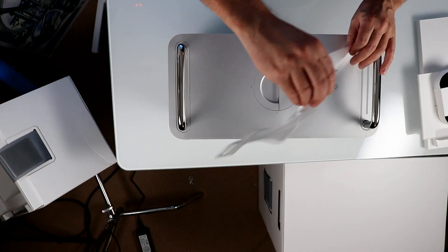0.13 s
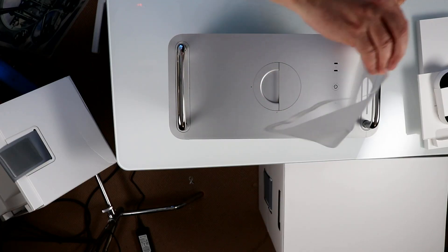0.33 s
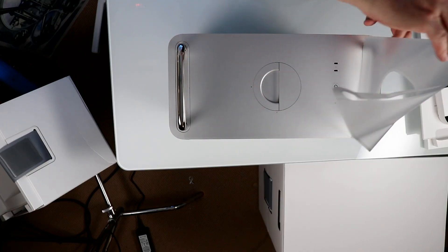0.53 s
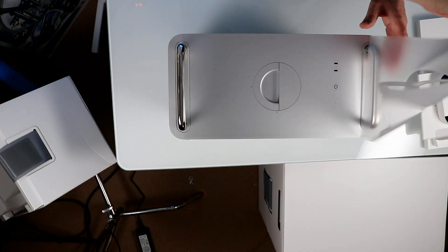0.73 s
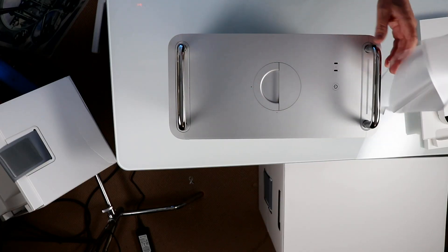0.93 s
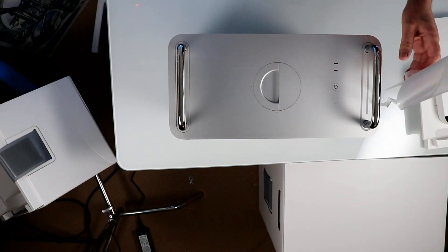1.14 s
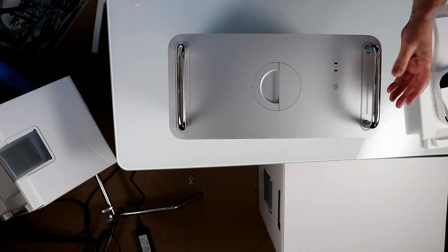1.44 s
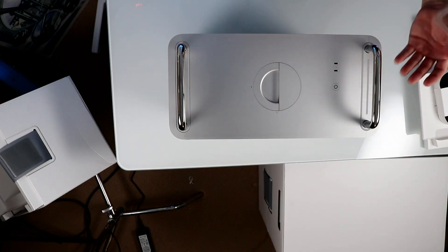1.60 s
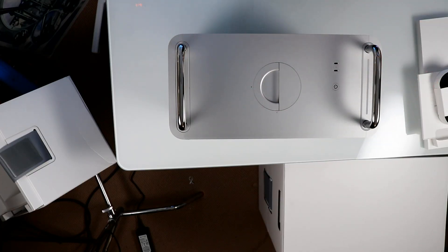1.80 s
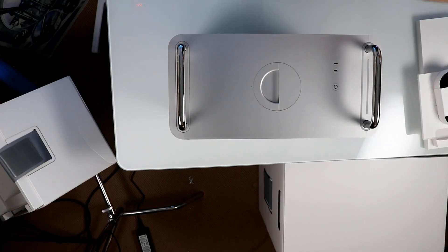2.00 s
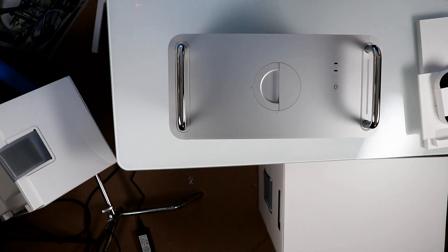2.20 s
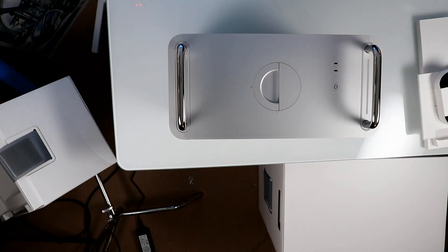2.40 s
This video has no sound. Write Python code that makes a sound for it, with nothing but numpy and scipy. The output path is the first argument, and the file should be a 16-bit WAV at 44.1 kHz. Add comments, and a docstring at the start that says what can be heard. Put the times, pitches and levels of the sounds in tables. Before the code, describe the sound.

Stiff protective film crinkles close to the microphone indoors, tearing free with a hard snap, pausing, crackling busily while moved away, then a few lighter snaps and faint ticks over very quiet hum and hiss.

```python
"""A soft rustle over faint mains hum and hiss is heard first, then a brief squeak and sharp snaps.
Thin stiff plastic film is pulled off a metal case, flapped and put aside, close to a microphone indoors.
Rustle is filtered random impulses; the glue squeak and the taut sheet's ring are noise through moving
resonances; creases snap as decaying noise bursts; air puffs are damped sines.
The room adds a diffuse tail to snaps, squeak and ring; a noise gate lowers everything in the pauses."""
import sys
import numpy as np
from scipy import signal
from scipy.fft import rfft, irfft
from scipy.io import wavfile
from scipy.ndimage import uniform_filter1d

SR = 44100
rng = np.random.default_rng(int(sys.argv[2]) if len(sys.argv) > 2 else 0)


def level_to_linear(level):
    """Convert decibel levels to linear amplitude factors, elementwise."""
    exponent = np.asarray(level, float) / 20
    return 10 ** exponent


def generate_wav(sig):
    """Save sig (samples, or channels by samples) to the path in sys.argv[1] as 16-bit PCM at SR."""
    pcm = np.round(np.clip(np.atleast_2d(sig).T, -1, 1) * 32767).astype(np.int16)
    wavfile.write(sys.argv[1], SR, pcm)


N = 112454  # length [samples]


def evened(x):
    """Normalisation: scales a signal to rms 1."""
    return x / np.sqrt(np.mean(x ** 2) + 1e-20)


def read(points, hz):
    """Spectral interpolation: reads a spectrum table on a logarithmic frequency axis."""
    f, value = np.transpose(points)
    return np.interp(np.log(hz + 1), np.log(f + 1), value)


def curve(table, index):
    """Envelope interpolation: one column of a time table at every sample."""
    table = np.array(table)
    return np.interp(np.arange(N) / SR, table[:, 0], table[:, index])


def add(mix, s, sound):
    """Superposition: adds a sound into the mix at time s."""
    part = mix[round(s * SR):][:len(sound)]
    part += sound[:len(part)]


def causal(gain_db):
    """Minimum-phase principle: the gain on the rfft bins fixes the phase, hence the impulse response."""
    log_gain = np.maximum(gain_db, -100) * np.log(10) / 20
    full = np.concatenate([log_gain, log_gain[-2:0:-1]])
    return np.fft.ifft(np.exp(np.conj(signal.hilbert(full)))).real


def slow(size):
    """Low-pass noise: a smooth random wobble of rms 1 from two moving averages."""
    once = uniform_filter1d(rng.standard_normal(N), size)
    return evened(uniform_filter1d(once, size))


def whistle(table, width_hz):
    """Heterodyne resonance: noise passes two equal poles, width_hz wide each, that follow a pitch curve."""
    turn = np.exp(2j * np.pi * np.cumsum(curve(table, index=1)) / SR)
    r = np.exp(-np.pi * width_hz / SR)
    x = rng.standard_normal(N) / turn
    for _ in range(2):
        x = signal.lfilter([1], [1, -r], x)
    t = np.arange(N) / SR
    inside = (t > table[0][0]) & (t < table[-1][0])
    return inside * level_to_linear(curve(table, index=2)) * evened((turn * x).real)


# rustle of the moving sheet: (time [s], body level [dB], treble level [dB], bass level [dB])
RUSTLE_LEVELS = [(0, -41.5, -39.5, -42), (.08, -47, -54.5, -51), (.12, -40, -52.5, -51),
                 (.16, -37, -44, -45.5), (.238, -40.5, -44.5, -47), (.242, -16.5, -23.5, -17.5),
                 (.275, -26.5, -29, -45), (.305, -22, -27, -31), (.36, -30, -36.5, -44.5),
                 (.43, -38, -43, -44.5), (.48, -39.5, -44.5, -48.5), (.56, -52, -54, -56),
                 (.74, -58.5, -61, -63), (.819, -50.5, -60.5, -55), (.823, -32, -35.5, -42),
                 (.86, -27.5, -33, -36.5), (.89, -25, -30.5, -33), (.94, -24.5, -32, -33),
                 (.96, -24, -31.5, -34), (1.0, -32.5, -36, -42.5), (1.04, -28, -30.5, -38.5),
                 (1.09, -35, -41, -40), (1.12, -32, -36, -42.5), (1.17, -47, -52.5, -54),
                 (1.22, -54, -58.5, -58), (1.355, -52.5, -56, -63), (1.358, -38.5, -46, -45),
                 (1.39, -33, -35.5, -46.5), (1.45, -45.5, -49, -51), (1.52, -51, -64.5, -52),
                 (1.62, -55.5, -61, -55.5), (1.87, -56.5, -61, -52), (1.91, -60.5, -60.5, -47.5),
                 (1.99, -53.5, -58, -46), (2.07, -56.5, -55.5, -58.5), (2.14, -49, -50.5, -54),
                 (2.146, -46, -41.5, -51), (2.19, -38, -43.5, -42.5), (2.24, -51.5, -53.5, -56.5),
                 (2.38, -59, -61, -61.5), (2.48, -56, -59, -53), (2.55, -55, -59, -49.5)]
# spectral shapes of the three ranges: (frequency [Hz], relative gain [dB])
BODY_SHAPE = [(200, -25), (500, -8), (800, -5), (1400, -0.5), (2500, -3.5), (4000, -5), (5200, -6.5),
              (7000, -14.5), (12000, -40.5)]
TREBLE_SHAPE = [(2500, -24.5), (5000, -13), (6500, -1.5), (10000, -5), (14000, -9.5), (16000, -13.5)]
BASS_SHAPE = [(12, -32), (30, -11), (120, -3), (300, -5), (700, -5.5), (1500, -13.5), (4000, -43.5)]
GRAINS_PER_S, GRAIN_SPREAD_DB, CLUMP_DB = 18000, 1.6, 1.1
PATCH_DB = 2  # rms variation of colour over time and frequency


def rustle():
    """Shot noise: clumped random crackles, patchy in colour, are filtered into three ranges."""
    spread_db = GRAIN_SPREAD_DB * np.minimum(rng.exponential(1, N), 5)
    size = level_to_linear(spread_db + CLUMP_DB * slow(size=150))
    grains = size * rng.standard_normal(N) * (rng.random(N) < GRAINS_PER_S / SR)
    z = signal.stft(grains, nperseg=256, noverlap=192)[2]
    patches = uniform_filter1d(rng.standard_normal(z.shape), size=6, axis=0)  # across frequency
    patches = evened(uniform_filter1d(patches, size=12, axis=1))  # along time
    grains = signal.istft(z * level_to_linear(PATCH_DB * patches), nperseg=256, noverlap=192)[1][:N]
    hz = np.fft.rfftfreq(4096, 1 / SR)
    out = np.zeros(N)
    for column, shape in enumerate((BODY_SHAPE, TREBLE_SHAPE, BASS_SHAPE), start=1):
        band = evened(signal.oaconvolve(grains, causal(read(shape, hz)))[:N])
        out += level_to_linear(curve(RUSTLE_LEVELS, index=column)) * band
    return out


# mains partials: (frequency [Hz], rms level before wavering [dB])
HUM_PARTIALS = [(59.6, -58.5), (119.6, -59.5), (240, -62), (360, -70.5)]
# spectral shape of the hiss: (frequency [Hz], relative gain [dB])
HISS_SHAPE = [(12, -23.5), (30, -4.5), (100, -1.5), (250, -10.5), (600, -11.5), (1500, -19.5),
              (5000, -33.5), (10000, -28), (16500, -38)]
HUM_WAVER_DB, HISS_DB = 1.5, -55.5  # rms of the waver, rms level of the hiss


def background():
    """Stationary sources: near-harmonic mains partials that waver in level, and shaped Gaussian hiss."""
    t = np.arange(N) / SR
    hum = np.zeros(N)
    for hz, db in HUM_PARTIALS:
        level = np.sqrt(2) * level_to_linear(db + HUM_WAVER_DB * slow(size=3000))
        hum += level * np.sin(2 * np.pi * (hz * t + rng.random()))
    spectrum = rfft(rng.standard_normal(N))
    hiss = irfft(spectrum * level_to_linear(read(HISS_SHAPE, np.fft.rfftfreq(N, 1 / SR))), N)
    return hum + level_to_linear(HISS_DB) * evened(hiss)


# taut sheet, a broad high band: (time [s], centre frequency [Hz], level [dB])
RING_PATH = [(.11, 4500, -60), (.135, 4700, -44), (.175, 5400, -43), (.2, 5000, -50), (.25, 4750, -45),
             (.29, 4750, -29), (.335, 4700, -29), (.37, 4600, -50)]


def sheet_ring():
    """Damped resonance: the taut sheet rings as a broad band of noise at a shifting pitch."""
    return whistle(RING_PATH, width_hz=900)


# decay time of the room by frequency: (frequency [Hz], 60 dB decay time [s])
ROOM_DECAY = [(200, .25), (1000, 0.33), (4000, .17), (12000, 0.17)]
ROOM_DB = -12.5  # tail gain


def room(x):
    """Diffuse reverberation: sparse random reflections, each band dying at its own speed."""
    taps = np.zeros(SR // 2)
    at = np.arange(100, SR // 2 - 20, 20)
    taps[at + rng.integers(0, 20, len(at))] = rng.choice([-1., 1.], len(at))
    hz, t, z = signal.stft(taps, SR, nperseg=256)
    decay = level_to_linear(-60 * t / read(ROOM_DECAY, hz)[:, None])
    tail = signal.istft(z * decay, SR, nperseg=256)[1]
    return signal.fftconvolve(x, tail / np.linalg.norm(tail))[:N]


# glue letting go: (time [s], centre frequency [Hz], level [dB])
SQUEAK_PATH = [(.128, 1850, -70), (.134, 1820, -39), (.165, 1750, -40), (.175, 1650, -45),
               (.185, 1600, -41), (.197, 1500, -47), (.21, 1450, -43), (.235, 1350, -47), (.245, 1350, -70)]


def glue_squeak():
    """Moving resonance: the glue squeaks, falling in pitch and uneven in level, as it lets go."""
    return whistle(SQUEAK_PATH, width_hz=340)


# creases snapping: (time [s], nominal peak level [dB], centre [Hz], breadth [octaves], decay time [ms])
CREASES = [(0.135, -38.5, 1720, 2.2, 3), (.2305, -13, 5150, 0.73, 0.39), (0.2401, -1, 2830, 2.53, 1.94),
           (0.2411, -8.5, 10600, 0.18, 1.2), (.246, -11.5, 4940, 2.7, 1.8), (.307, -17.5, 3630, 2.1, 7),
           (.411, -43, 9000, 1.5, 1), (0.461, -25.5, 3480, 0.73, 1.5), (.559, -40.5, 3370, 0.7, 2),
           (.645, -46.5, 3400, 2.3, 1.7), (.778, -46, 1500, 1.4, 5), (0.808, -36, 3500, 0.84, 2),
           (0.8217, -19, 6000, 3.1, 2.2), (0.844, -22, 11000, 0.87, 1), (.855, -17, 2530, 1.3, 1.6),
           (.875, -10, 3700, 1.67, 2.6), (.878, -10.5, 3380, 1.07, 2.8), (.907, -18, 5000, 3.6, 3.9),
           (.925, -16.5, 8500, 0.28, 0.86), (0.945, -5.5, 7800, 1.5, 0.72), (0.949, -22, 10640, .8, 0.57),
           (0.9522, -4, 4800, 2, 0.84), (0.964, -12.5, 3500, 0.82, 1.5), (0.99, -19.5, 3000, 1.9, 2.3),
           (1.015, -19, 4950, 5.3, 3.7), (1.019, -11.5, 3240, 1.34, 2.1), (1.029, -15, 7900, 1.1, 2.8),
           (1.066, -12.5, 3760, 2.25, 1.7), (1.07, -16.5, 2800, 0.5, 1.4), (1.107, -18.5, 2780, 1.4, 7.1),
           (1.111, -15, 3500, 5.7, 1.3), (1.3574, -23.5, 2440, 1.2, 0.96),
           (1.3557, -18.5, 12300, 0.54, 0.86), (1.370, -17, 9000, 1.8, 1.3), (1.383, -20, 1860, 0.97, 3.1),
           (1.434, -29, 1480, 1.1, 4.9), (1.468, -29, 1910, 1.1, 2.3), (1.514, -34.5, 1860, 0.84, 2.7),
           (1.550, -39.5, 2500, 0.71, 3.2), (1.585, -42, 2400, 1.1, 2.6), (1.646, -40, 2980, 2, 0.72),
           (1.664, -35.5, 11300, 0.88, 0.76), (1.745, -48.5, 10000, 1.5, 5.6),
           (1.705, -43.5, 2320, 0.7, 6.8), (1.762, -38, 1650, .8, 2), (1.769, -46.5, 5000, 1.3, 1.2),
           (1.802, -45, 8930, 1.5, 5.1), (1.899, -37.5, 900, 1.4, 0.78), (1.93, -48, 1480, 2.2, 1.1),
           (1.976, -45, 8000, 2, 0.91), (1.948, -47, 2500, 2, 1.3), (1.971, -44, 1500, 1.3, 1.3),
           (1.982, -42, 1500, 2, 1.3), (1.992, -39.5, 1110, 0.9, 2.8), (2.01, -55, 3000, 1, 0.84),
           (2.025, -40.5, 2920, 3.2, 3.6), (2.1435, -16.5, 1920, 0.75, 0.5),
           (2.1437, -17.5, 8600, 1.2, 0.84), (2.181, -20.5, 2500, 3.1, 0.98),
           (2.254, -41.5, 1220, 1.3, 4.1), (2.299, -35.5, 3000, 1.5, 2.4), (2.463, -42.5, 900, 1.07, 2),
           (2.464, -43, 12000, 0.53, 1), (2.474, -45, 2700, 0.86, 2), (2.517, -41.5, 2450, 0.69, 3)]


def snaps():
    """Impulsive excitation: each crease gives a quickly dying volley of clicks in its own band."""
    out = np.zeros(N)
    t = np.arange(2048) / SR
    hz = np.fft.rfftfreq(1024, 1 / SR)
    for s, db, centre_hz, octaves, ms in CREASES:
        a, b = rng.standard_normal((2, 2048))
        clicks = a * np.exp(.3 * b)  # uneven in strength
        volley = clicks * np.minimum(t / .0003, 1) * np.exp(-t / (max(ms, .2) / 1000))
        distance = np.log2((hz + 20) / centre_hz) / max(octaves, .2)
        snap = signal.fftconvolve(volley, causal(-18 * np.log(1 + distance ** 2)))[:2048]
        rms = np.sqrt(np.mean(snap[:int(ms * SR / 1000) + 20] ** 2))
        add(out, s, level_to_linear(db - 6) * snap / rms)  # rms is 6 dB under the nominal peak
    return out


# air pushed by the sheet: (time [s], level before damping [dB], frequency [Hz])
AIR_PUSHES = [(0.24, -22.5, 64), (.2404, -20.5, 165), (0.2409, -8.5, 564), (0.305, -19.5, 256),
              (.822, -37, 117), (0.874, -33, 197), (1.15, -42, 50.1), (1.3575, -35, 59), (1.3551, -27, 594),
              (1.468, -28, 534), (1.821, -41.5, 59), (1.897, -32, 133), (1.926, -33, 121), (1.943, -38, 65),
              (1.972, -42, 60.3), (1.983, -32, 300), (2.1426, -37.5, 60), (2.1435, -22.5, 620),
              (2.181, -41.5, 69.3), (2.463, -50, 120.3), (2.515, -46, 124)]


def puffs():
    """Damped oscillation: a low push of air swings back once or twice."""
    out = np.zeros(N)
    t = np.arange(4000) / SR
    for s, db, hz in AIR_PUSHES:
        add(out, s, -level_to_linear(db) * np.sin(2 * np.pi * hz * t) * np.exp(-1.6 * hz * t))
    return out


def scene():
    """Superposition: film sounds, the room tail of the sharp ones, and the background."""
    sharp = snaps() + sheet_ring() + glue_squeak()
    return (sharp + level_to_linear(ROOM_DB) * room(sharp) + rustle() + puffs() + background())[None]


def roll_off(x):
    """The treble ends steeply here."""
    return signal.sosfilt(signal.butter(12, 16650, fs=SR, output="sos"), x)


# level of half the gate's depth, full depth, softness of the knee, fall of the held level
GATE_DB, GATE_DEPTH_DB, GATE_KNEE_DB, GATE_CLOSE_DB_PER_S = -46, 13, 4, 250
EDGE_HZ = 15800  # upper band limit


def record(dry):
    """Downward expansion: a gate opens at once and closes quickly; then clipping and a band limit."""
    power_db = 10 * np.log10(abs(uniform_filter1d(dry[0] ** 2, size=200)) + 1e-12)
    fall = np.arange(N) * GATE_CLOSE_DB_PER_S / SR
    held_db = np.maximum.accumulate(power_db + fall) - fall  # peak hold, falling steadily
    gated = dry * level_to_linear(-GATE_DEPTH_DB / (1 + np.exp((held_db - GATE_DB) / GATE_KNEE_DB)))
    low_pass = signal.firwin(255, EDGE_HZ, window=("kaiser", 7), fs=SR)
    mix = signal.oaconvolve(np.clip(gated, -1, 1), low_pass[None], "same")
    return roll_off(mix)


dry = scene()
out = record(dry)
generate_wav(out)
```